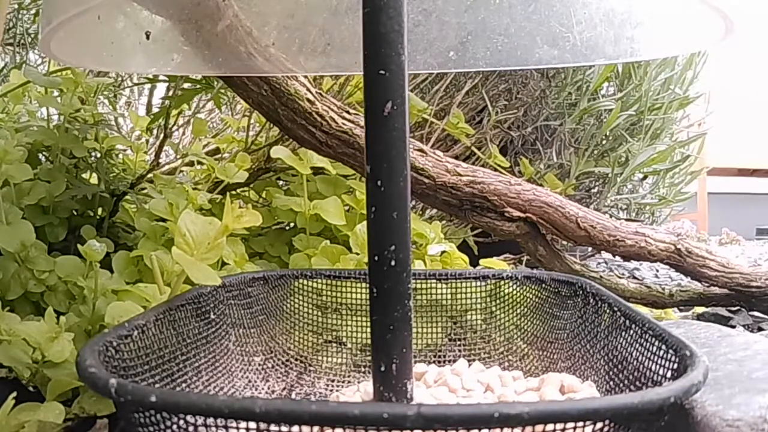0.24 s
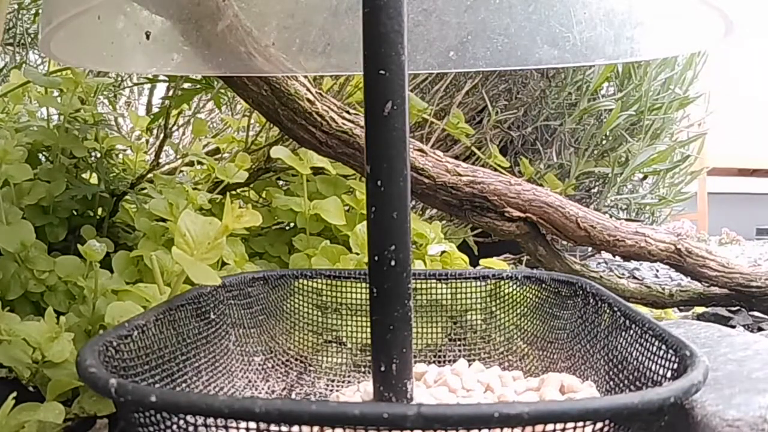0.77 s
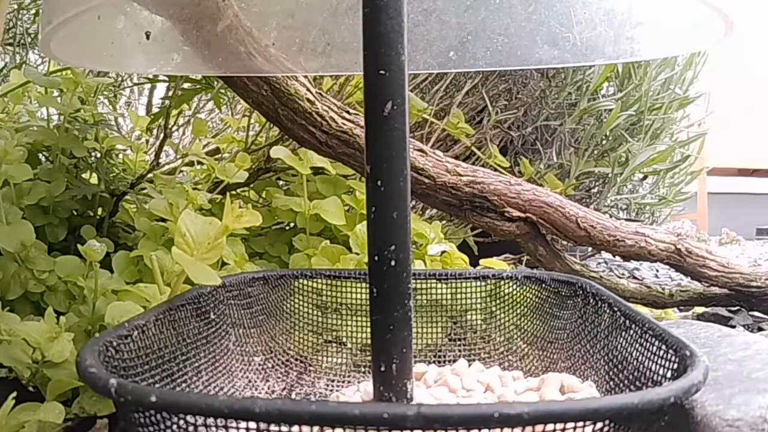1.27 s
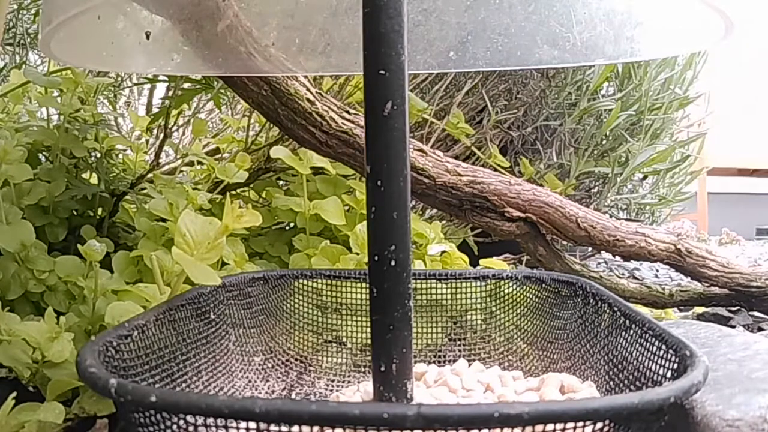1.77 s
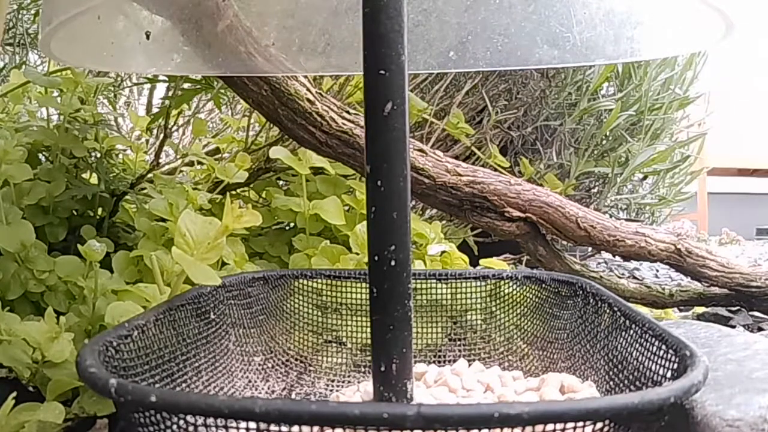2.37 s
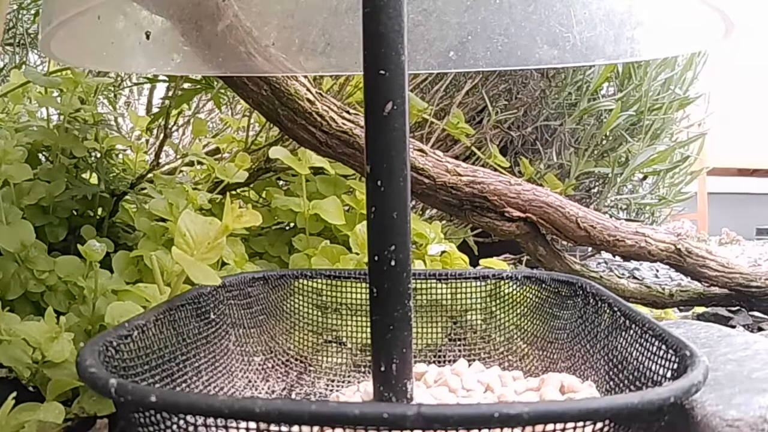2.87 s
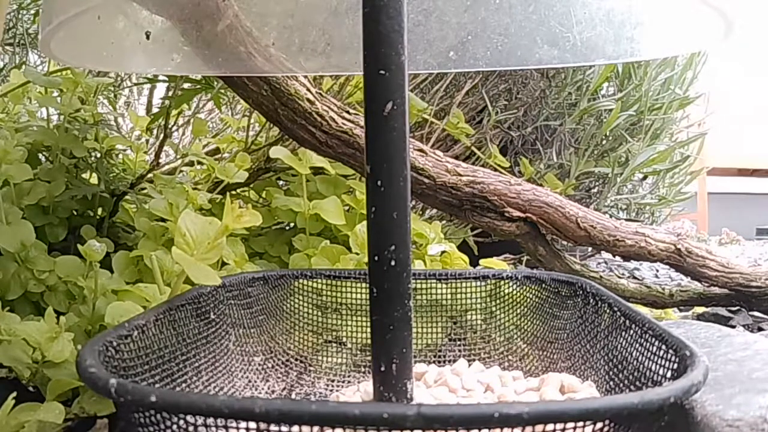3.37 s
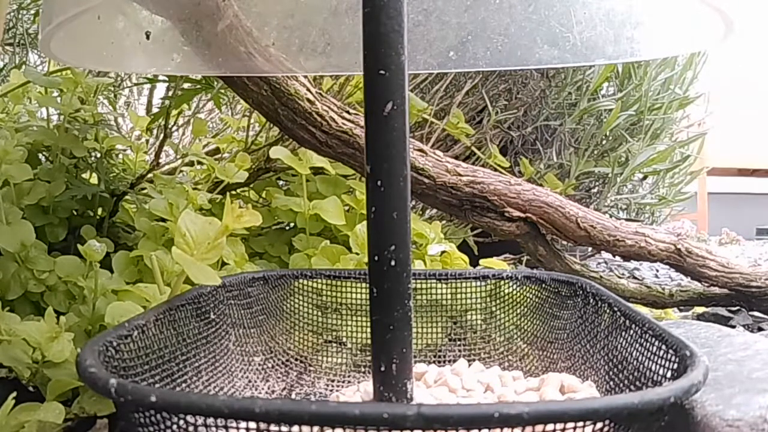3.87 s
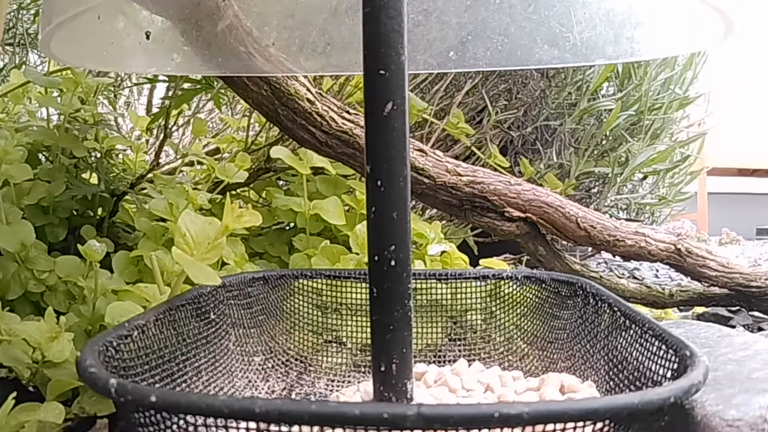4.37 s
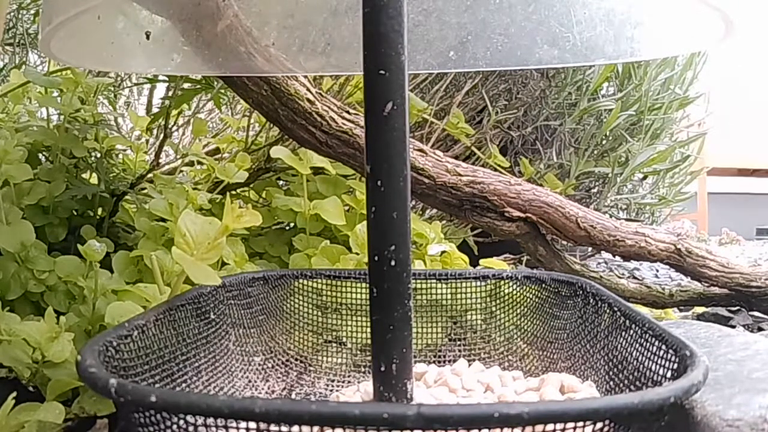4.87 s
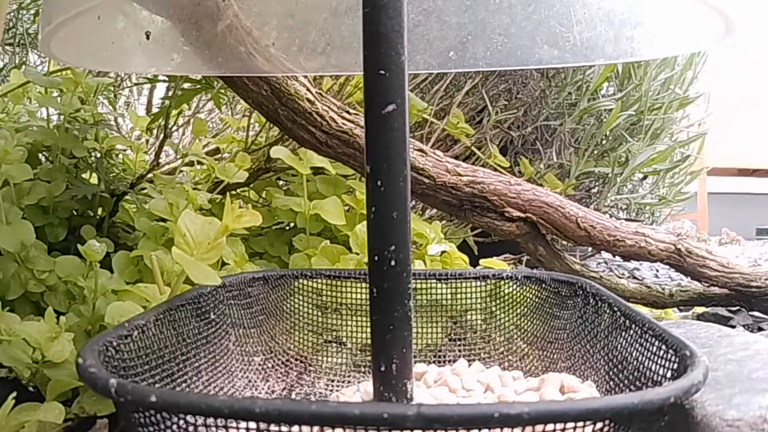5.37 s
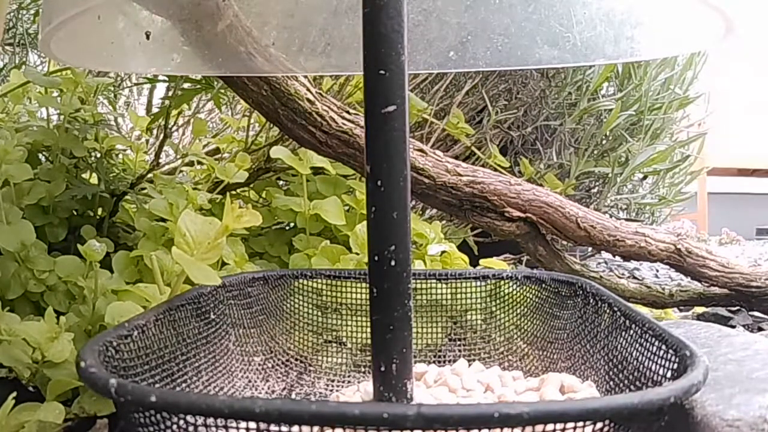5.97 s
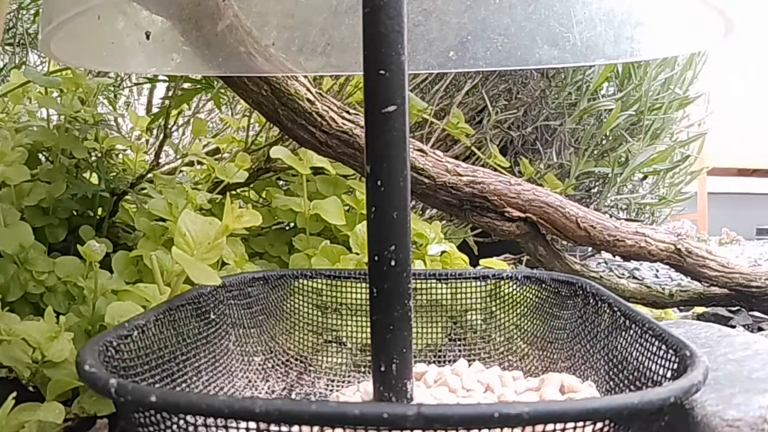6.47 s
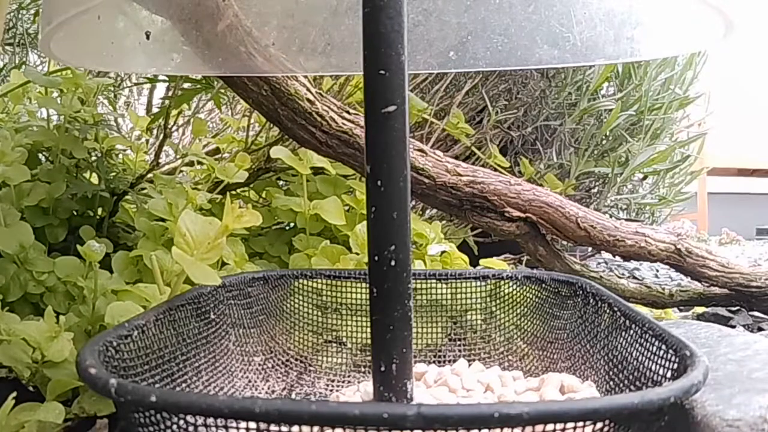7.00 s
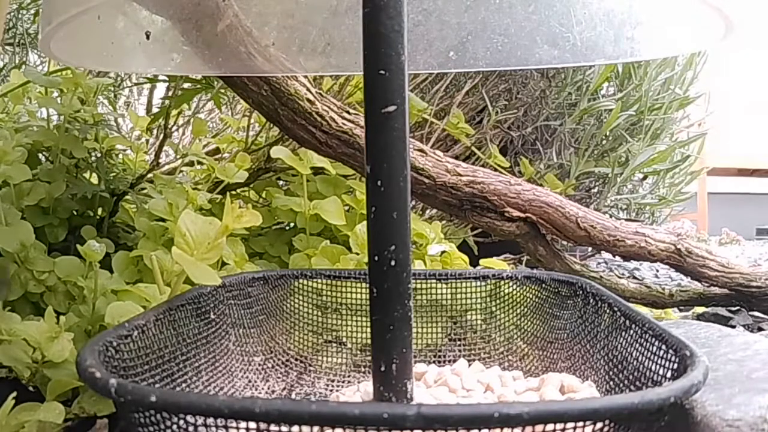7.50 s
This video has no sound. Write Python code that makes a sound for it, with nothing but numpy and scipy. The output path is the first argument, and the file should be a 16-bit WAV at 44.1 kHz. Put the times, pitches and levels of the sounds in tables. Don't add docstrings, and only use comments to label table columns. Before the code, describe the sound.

A small animal wails three times with descending calls, the last squeaky and broken, over soft distant traffic, far chirps and tiny insect ticks.

```python
import sys
import numpy as np
from scipy import signal
from scipy.io import wavfile
from scipy.ndimage import uniform_filter1d

SR = 44100
rng = np.random.default_rng(int(sys.argv[2]) if len(sys.argv) > 2 else 0)


def undo_db(level):
    steps = np.asarray(level, float) / 20
    return 10 ** steps


def inscribe(sig):
    pcm = np.round(np.clip(np.atleast_2d(sig).T, -1, 1) * 32767)
    wavfile.write(sys.argv[1], SR, pcm.astype(np.int16))


N = 341334
DROPOUT_S = 1.2593


def evened(x):
    return x / np.sqrt(np.mean(x ** 2) + 1e-20)


def read(points, hz):
    f, value = np.transpose(points)
    return np.interp(np.log(hz + 1), np.log(f + 1), value)


def curves(rows):
    s, *columns = np.transpose(sorted(rows))
    t = np.arange(round(s[0] * SR), round(s[-1] * SR)) / SR
    return t, *(np.interp(t, s, c) for c in columns)


def span(t):
    start = round(t[0] * SR)
    return slice(start, start + len(t))


def add(mix, s, sound):
    part = mix[round(s * SR):][:len(sound)]
    part += sound[:len(part)]


def add_bump(curve, s, length, size):
    add(curve, s - length / 2, np.multiply.outer(np.hanning(round(length * SR)), size))


def wander(hz):
    smooth = signal.butter(2, hz, fs=SR, output="sos")
    return evened(signal.sosfiltfilt(smooth, rng.standard_normal(N)))


def tone(db, turns):
    return np.sqrt(2) * undo_db(db) * np.cos(2 * np.pi * turns)


def resonate(x, hz, width):
    turn = np.exp(2j * np.pi * hz * np.arange(len(x)) / SR)
    r = np.exp(-np.pi * width / SR)
    return 2 * (turn * signal.lfilter([(1 - r) ** 2], [1, -2 * r, r ** 2], x / turn)).real


# (frequency [Hz], density [dB per Hz])
HUSH_SPECTRUM = [(18, -26.5), (27, -8.5), (45, 2.5), (90, -4.5), (170, -9), (320, -14.5), (700, -21),
                 (1440, -26.5), (2600, -32), (5100, -36.5), (9200, -40.5), (11400, -40), (13400, -47),
                 (14000, -51.5), (15100, -52.5), (15500, -78.5)]
# (frequency [Hz], width [Hz], level [dB])
TREBLE_BANDS = [(10000, 270, -15.5), (11930, 350, -15), (12900, 250, 2), (11360, 140, 0.5)]


def hush():
    frames, hz = N // 512 + 5, np.fft.rfftfreq(2048, 1 / SR)
    a, b, patches = rng.standard_normal((frames, 1025, 3)).T
    patches = uniform_filter1d(patches, size=16, axis=0)
    patches = evened(uniform_filter1d(patches, size=8, axis=1))
    bands_db = sum(db * np.exp(-((hz - f) / w) ** 2) for f, w, db in TREBLE_BANDS)
    patchy_db = 1.2 - 0.6 * np.clip(hz / 12000, 0, 1)
    level_db = (read(HUSH_SPECTRUM, hz) + bands_db)[:, None] + patchy_db[:, None] * patches
    noise = signal.istft((a + 1j * b) * undo_db(level_db), nperseg=2048, noverlap=1536)[1][:N]
    return undo_db(-55.5) * evened(noise)


# (time [s], peak level [dB])
INSECT_TICKS = [(.2843, -83), (.4209, -80), (.5576, -81), (.6504, -79), (1.7843, -75.5), (1.9913, -80),
                (2.114, -81.5), (2.295, -79.5), (2.5366, -83.5), (2.6653, -83), (2.835, -80), (3.045, -79),
                (3.2844, -77.5), (3.5494, -79), (4.367, -79), (4.7895, -78.5), (5.0544, -81), (5.5323, -82),
                (5.7825, -77.5), (5.9529, -78.5), (6.0841, -78.5), (6.2951, -81.5), (6.5056, -79.5),
                (6.6527, -80), (6.7965, -79.5), (6.985, -77), (7.1626, -80), (7.3158, -80), (7.5203, -81),
                (7.6445, -77), (3.77, -82), (4.015, -82), (4.16, -82)]


def insects():
    out, scratch = np.zeros(N), rng.standard_normal((len(INSECT_TICKS), 900))
    t = np.arange(900) / SR
    swell = t / 0.0025 * np.exp(1 - t / 0.0038)
    for (s, db), noise in zip(INSECT_TICKS, scratch):
        hz = 11260 + 80 * noise[0]
        add(out, s, undo_db(db - 3.0) * evened(resonate(noise, hz, 500)) * swell)
    return out


# (time [s], length [s], pitch jump [share], level [dB], even
# partials [dB])
VOICE_CATCHES = [(0.561, .02, 0, 1.5, -6), (0.615, .045, .018, 1, -2.5), (1.612, .03, 0.036, -8, -1),
                 (1.461, 0.017, .012, 0, 1), (.624, .01, 0, 0.5, -8), (.628, .014, -.008, 1, 0),
                 (0.712, .04, .009, 2, -2), (0.771, 0.033, -0.00056, -3.5, 7),
                 (0.796, .02, 0.0059, -1, 1), (0.825, .02, 0.0099, -2, 1), (1.003, 0.077, .006, 0.2, 2),
                 (1.121, .04, -0.014, -3.5, 5.5), (1.207, .02, -.01, -0.5, 3),
                 (1.302, .08, -.011, 2, -1.5), (1.428, 0.023, .014, -0.5, -5),
                 (1.453, 0.018, .015, 0.5, 0), (0.632, 0.033, -0.014, 3.5, -14),
                 (0.68, 0.065, 0, -2, -6.5), (0.824, 0.074, -0.03, 4.5, -0.5),
                 (0.866, .08, 0.0058, 1.5, 5.5), (0.981, .08, -0.021, -2, 2),
                 (1.081, 0.12, 0.012, 3, -5.5), (1.136, 0.035, -.012, 4, -7),
                 (1.155, 0.063, .028, -7.5, 9.5), (1.244, 0.055, 0, -3.5, 3),
                 (1.45, 0.053, -0.0062, 1, -6), (1.555, 0.065, -0.013, 2, -12),
                 (1.57, 0.036, -.04, 4, 4.5),
                 (3.072, .04, -0.035, -0.5, -1.5), (3.215, .02, 0.011, 3, -3.5),
                   (3.614, .04, -0.032, -1, 1.5), (3.038, 0.011, 0, -20, 3),
                   (3.05, 0.014, 0.022, -5.5, 6.5), (3.629, .014, 0.0063, -4, -9),
                   (3.701, 0.022, -0.015, -0.5, -2), (3.736, 0.017, 0.022, 3.5, -1),
                   (3.82, .03, 0, -3.5, 4), (3.888, .035, -0.018, 1, -11), (3.072, 0.043, 0.033, 9, -16.5),
                   (3.1, 0.081, -0.00049, 3, -2), (3.249, 0.069, 0.0148, -1, 4),
                   (3.344, 0.023, 0.017, -0.5, 2), (3.368, 0.036, -0.021, 4.5, -5),
                   (3.386, 0.04, 0.016, 2, -0.5), (3.54, 0.16, 0, 1.5, 2), (3.613, 0.028, 0.013, 0, -6.5),
                   (3.679, 0.063, 0.011, 3.5, 0), (3.705, 0.024, -0.014, -7, 10),
                   (3.79, 0.042, -0.016, -2, 1), (3.8, 0.12, 0.021, -18, 18.5),
                   (3.855, 0.11, 0.0041, 3, 4.5), (3.66, .04, .012, 0, -1), (3.575, .04, -.008, 0, 0),
                   (3.047, .008, -0.0017, 1, 1),
                 (5.122, .03, 0.0028, 1, -15), (5.225, .02, 0.0427, -1, 1),
                      (5.314, 0.041, -.01, 1.5, 2), (5.345, 0.036, -.015, 3, 3.5),
                      (5.37, 0.019, -0.0205, -1, 7), (5.42, 0.057, -.015, 3.5, -7),
                      (5.453, .04, 0.043, -1, -4.5), (5.472, .036, .17, 2, -9.5),
                      (5.496, 0.071, 0, -20.5, 8.5), (5.565, 0.0847, .045, -2.5, 0.5),
                      (5.597, 0.04, .02, -0.5, -8.5), (5.729, 0.042, 0.12, -9, -9),
                      (5.743, 0.04, -0.16, -21, 2), (5.77, 0.043, -.02, -1.5, -22),
                      (5.793, 0.058, -.025, 6, -14), (5.87, 0.03, 0, 1.5, -4.5),
                      (5.485, .025, .05, 7, -19.5), (5.501, 0.013, .02, 1, 4.5),
                      (5.536, 0.015, 0.0065, 2, -10), (5.713, 0.017, .02, -5.5, 1),
                      (5.73, 0.015, -.03, 7, -4.5), (5.744, .018, .05, 12, -2), (5.547, 0.0092, 0, -4, -4),
                      (5.815, 0.038, 0, 5.5, -6.5), (5.846, .016, 0, -4.5, 4), (5.861, .016, 0, 5, -4),
                      (5.915, .05, 0.032, -17.5, 21), (5.59, .035, .025, -0.5, 0),
                      (5.638, 0.036, 0, 1.5, 0), (5.398, .014, 0.028, -1.5, 2.5),
                      (5.303, .014, -0.0114, -1.5, 2.5)]
# (time [s], length [s], level [dB])
MOUTH_SHIFTS = [(3.132, 0.082, -4), (3.38, .02, -6.5), (3.448, 0.044, -6), (3.608, .02, -4.5),
                (3.63, .04, -14), (3.66, .03, 4.5), (3.702, 0.022, 6.5), (3.722, 0.017, -2),
                (5.383, 0.017, -6.5), (5.433, .04, 4.5), (5.475, 0.033, -17), (5.528, .03, -7),
                (5.547, .03, 7), (5.79, .03, -7), (5.814, .016, -8), (5.86, .016, 2.5), (.78, .09, 8),
                (3.8, .04, 7)]
# (time [s], length [s], level [dB])
FOURTH_PARTIAL = [(3.11, .04, 5), (3.235, .14, -12), (3.33, .07, 7), (3.41, .07, 3), (3.6, .05, -8),
                  (3.66, .05, 0), (5.22, .06, -7.5), (5.278, .06, 8), (5.33, .04, 13), (5.36, .04, 4),
                  (5.432, .07, -6), (1.6, .05, -6), (1.29, .045, 7.5), (5.685, .07, -9), (5.86, .07, -9),
                  (5.915, .03, 7), (5.56, .06, 5), (3.57, .04, -3)]
EVEN_SHARE = [0, 0.9, 0.088, 0.73]
# (frequency [Hz], width [Hz], level [dB])
PASSAGE_BANDS = [(3536, 90, -5.5), (4040, 250, 8), (5370, 390, -0.5), (6294, 250, -12), (7100, 250, -27),
                 (8080, 320, 7), (8990, 450, 9), (13070, 3340, -27.5)]


def cry(rows, scoop, scoop_s, sag, *partials_db):
    t, hz, effort_db, even_db, bright_db = curves(rows)
    since, left = t - t[0], t[-1] - t
    catches = np.zeros((5, N))
    for s, length, *sizes in VOICE_CATCHES:
        add_bump(catches[:3].T, s, length, sizes)
    for s, length, db in MOUTH_SHIFTS:
        add_bump(catches[3], s, length, db)
    for s, length, db in FOURTH_PARTIAL:
        add_bump(catches[4], s, length, db)
    jump, dip_db, tip_db, glint_db, fourth_db = catches[:, span(t)]

    hz = hz * (1 - scoop * np.exp(-(since / scoop_s) ** 2))
    hz = hz * (1 - sag * np.maximum(1 - left / 0.06, 0) ** 2) * (1 + jump)
    hz = hz * (1 - 0.045 * (t[0] < DROPOUT_S) * (t > DROPOUT_S))
    hz = uniform_filter1d(hz, size=200)

    attack_db, attack_s, overtones_late_s = -12, 0.019, 0.019
    db = effort_db + dip_db + attack_db * np.maximum(1 - since / attack_s, 0)
    db = db - 6 * np.maximum(1 - left / 0.023, 0)
    bright_db = bright_db + glint_db + attack_db * np.clip(2 - since / overtones_late_s, 0, 1)
    levels = []
    for k, own_db in enumerate((0, *partials_db)):
        passage_db = sum(g * np.exp(-(((k + 1) * hz - f) / w) ** 2) for f, w, g in PASSAGE_BANDS)
        colour_db = EVEN_SHARE[k] * (even_db + tip_db) + k // 2 * bright_db + k // 3 * fourth_db
        levels.append(db + own_db + colour_db + passage_db)
    return t, hz, levels


# (time [s], pitch [Hz], effort [dB], lift of the even partials [dB], brightness [dB])
HIGH_CRY_PATH = [
    (0.546, 4540, -61.5, -24, 0),
    (0.593, 4500, -42, -8.5, -4),
    (.635, 3937, -39.5, -18.5, -8),
    (.715, 3345, -46.5, -6.5, -15.5),
    (.985, 2754, -48, 1, 1.5),
    (1.202, 2440, -50.5, 6.5, -7.5),
    (1.402, 2453, -46, 6, 14),
    (1.469, 2184, -42, -5.5, -14.5),
    (1.611, 2175, -46.5, 5.5, 4),
]
LOW_CRY_PATH = [
    (3.036, 1452, -59, 3.3, 2),
    (3.202, 1377, -53, 1, 5),
    (3.301, 1245, -59, 1.5, 2),
    (3.478, 1118, -54.5, 5, -3),
    (3.59, 1102, -52.5, 7.5, 1),
    (3.63, 1048, -56, 9.3, 0.5),
    (3.72, 1025, -53, 7.4, 6.5),
    (3.791, 917, -64, 11.8, -5),
    (3.906, 886, -60, 5.8, -2.5),
]
BROKEN_CRY_PATH = [
    (5.12, 1372, -53, -10.5, 4),
    (5.189, 1419, -52, 0, 4.5),
    (5.3, 1374, -52, -1.5, 2),
    (5.375, 1242, -61, 1, 12),
    (5.525, 1111, -52.5, 6, -1.5),
    (5.614, 1048, -45.5, -.5, -3.5),
    (5.703, 1042, -49, -2, -0.5),
    (5.829, 992, -57, 12, -7.5),
    (5.927, 927, -58, 10, 11.5),
]
# (scoop up into the pitch [share], scoop time [s], final sag [share],
# partial 2 [dB], partial 3 [dB], partial 4 [dB])
CRY_VOICES = [
    (-0.068, 0.015, 0.4, -12.5, -33, -44.5),
    (0.27, 0.027, 0.14, 1.5, -8.5, -29),
    (.11, 0.0161, 0.26, 0.5, -15.5, -33.5),
]


def cries(uneven, tremble, shimmer_db, throb):
    out, turns, pitch = np.zeros((3, N))
    slip = wander(220)
    for rows, voice in zip((HIGH_CRY_PATH, LOW_CRY_PATH, BROKEN_CRY_PATH), CRY_VOICES):
        t, hz, levels = cry(rows, *voice)
        at = span(t)
        pitch[at] = hz * (1 + 0.0039 * tremble[at])
        turns[at] = np.cumsum(pitch[at]) / SR + 0.085 * (uneven * slip)[at]
        if t[0] < DROPOUT_S:
            turns[at] += np.where(t < DROPOUT_S, 0.31, 0.0) - turns[round(DROPOUT_S * SR)]
        stack = np.zeros(len(t))
        for k, db in enumerate(levels):
            db = db - 2 * np.maximum(-83 - db, 0)
            beats = 1 + min(k + 0.11, 1) * (uneven * throb)[at]
            stack += tone(db + 0.9 * shimmer_db[at], (k + 1) * turns[at]) * beats
        out[at] = stack * signal.windows.tukey(len(t), 0.012)
    return out, turns, pitch


# (time [s], length [s], start pitch [Hz], end pitch [Hz], level [dB])
BIRD_CHIRPS = [(.665, .05, 2560, 2420, -72), (.74, .09, 4160, 3920, -73), (1.75, .035, 3890, 4130, -76),
               (1.87, .047, 4200, 3580, -72.5), (1.9, .027, 3650, 4150, -69), (2.85, .025, 3850, 4050, -76),
               (2.935, .03, 2390, 2240, -74), (3.99, .06, 4280, 3690, -74), (6.238, .014, 3200, 1950, -70),
               (7.155, .045, 2660, 2540, -77), (7.18, .055, 2580, 2535, -75.5),
               (7.185, .035, 2620, 2760, -76.5), (7.22, .05, 2610, 2560, -79),
               (6.285, .05, 2450, 2750, -79), (7.09, .06, 2960, 2900, -79), (5.96, .03, 3150, 2900, -80),
               (5.96, .065, 3000, 2430, -78), (6.005, .05, 2480, 2430, -72), (6.035, .075, 2440, 2760, -76),
               (6.22, .08, 2790, 2390, -76)]


def birds():
    out, fray = np.zeros(N), wander(hz=90)
    for s, length, start_hz, end_hz, db in BIRD_CHIRPS:
        u = np.linspace(0, 1, round(length * SR))
        hz = start_hz + (end_hz - start_hz) * u
        add(out, s, tone(db, np.cumsum(hz) / SR) * np.sin(np.pi * u))
    return out * (1 + 0.45 * fray)


# (time [s], length [s], breath level [dB], unevenness [0-1])
VOICE_BREAKS = [(1.262, 0.0051, -58, 0.05), (1.284, 0.017, -64.5, 0.1), (1.303, 0.0072, -72.5, .05),
                (1.346, 0.012, -67.5, 0.05), (3.061, 0.048, -76, 0.3), (3.591, 0.0062, -62.5, 0.5),
                (3.62, 0.07, -59, 0.4), (3.692, 0.04, -65, 0.15), (3.79, 0.066, -71, 0.32),
                (3.886, 0.045, -66, 0.4), (5.302, 0.15, -82, 0.13), (5.395, 0.13, -83, 0.2),
                (5.499, 0.032, -69.5, 0.2), (5.532, 0.038, -74.5, 0.4), (5.607, 0.032, -67, 0.25),
                (5.74, 0.055, -63.5, 0.6), (3.62, .012, -59.5, .2), (3.636, .02, -61, .2),
                (3.755, .025, -66, 0.1), (3.859, 0.022, -67, .2), (5.345, .025, -70, .1),
                (5.376, 0.026, -70, .1), (5.419, 0.023, -70, .1), (5.65, .015, -68, 0.2)]


def uneven_beats():
    uneven = np.zeros(N)
    for s, length, _, share in VOICE_BREAKS:
        add_bump(uneven, s, length, share)
    return uneven


# (frequency [Hz], width [Hz], level [dB])
NARROW_THROAT = [(3820, 170, 0)]
# (frequency [Hz], width [Hz], level [dB])
OPEN_THROAT = [(1480, 820, 5.5), (2270, 980, 6.5), (2870, 260, -34), (4230, 790, -10)]


def breath():
    out = np.zeros(N)
    noises = rng.standard_normal((len(VOICE_BREAKS), 5000))
    for (s, length, db, _), noise in zip(VOICE_BREAKS, noises):
        throat = NARROW_THROAT if s < 2 else OPEN_THROAT
        puff = evened(sum(undo_db(g) * resonate(noise, f, w) for f, w, g in throat))[:round(length * SR)]
        grain = evened(uniform_filter1d(noise[::-1], size=90))[:len(puff)]
        puff = puff * np.maximum(1 + 0.6 * grain, 0)
        add(out, s - length / 2, undo_db(db) * puff * np.hanning(len(puff)))
    return signal.sosfilt(signal.butter(4, 6000, fs=SR, output="sos"), out)


# (time [s], share of the pitch [share], level [dB])
FLUTTER_PATH = [
    (1.366, .4, -68),
    (1.395, .4, -69),
    (1.42, .47, -68),
    (1.435, .49, -75),
    (1.456, .47, -73),
    (1.468, .38, -71),
    (1.5, .33, -68),
    (1.532, .34, -67),
    (1.544, .46, -70),
    (1.56, .4, -79),
]
SIDE_PLACES = [(0, 1), (1, -1), (1, 1), (2, -1), (2, 1), (3, -1), (0, 2), (1, 2)]
SIDE_LEVELS = [0.5, 4.5, 3.5, 4, -9, -9, -1, -6]


def flutter(turns, pitch, tremble, shimmer_db, throb):
    out = np.zeros(N)
    t, share, db = curves(FLUTTER_PATH)
    at = span(t)
    side_turns = np.cumsum(pitch[at] * (share + 0.012 * tremble[at])) / SR
    for (k, side), side_db in zip(SIDE_PLACES, SIDE_LEVELS):
        own_shimmer_db = 2.2 * np.roll(shimmer_db, 3000 * (k + 3 * side))[at]
        out[at] += tone(db + side_db + own_shimmer_db, k * turns[at] + side * side_turns)
    out[at] *= signal.windows.tukey(len(t), 0.08) * (1 + 0.25 * throb[at])
    return out


BLEND_TONES = [(1, 1), (2, 0)]
BLEND_LEVELS = [-3, -12]


def membrane(rows, turns, jitter):
    out = np.zeros(N)
    t, hz, db, coupling_db = curves(rows)
    at = span(t)
    second = np.cumsum(hz * (1 + jitter[at])) / SR
    sound = tone(db, second)
    for (a, b), blend_db in zip(BLEND_TONES, BLEND_LEVELS):
        sound += tone(db + coupling_db + blend_db, a * second + b * turns[at])
    out[at] = sound * signal.windows.tukey(len(t), 0.2)
    return out


# (time [s], length [s], start pitch [Hz], end pitch [Hz], level [dB])
SQUEAK_GLIDES = [(3.603, 0.025, 2450, 2250, -54), (3.876, 0.023, 1990, 1850, -52.5),
                 (5.334, 0.019, 2780, 2700, -52), (5.366, .036, 2200, 2600, -52.5),
                 (5.394, 0.047, 2400, 2400, -58), (5.408, 0.022, 2880, 2830, -65.5),
                 (5.733, .014, 2870, 2850, -62), (5.741, 0.015, 2600, 2660, -60),
                 (5.493, 0.02, 2570, 2500, -64.5), (5.733, .016, 2800, 1800, -52.5),
                 (5.586, 0.023, 2250, 2660, -56.5), (5.721, 0.021, 2450, 2560, -51),
                 (5.744, 0.024, 2260, 2050, -55.5), (5.737, 0.016, 2100, 1900, -56),
                 (5.37, .02, 2680, 2300, -60), (5.342, .016, 2850, 2780, -60),
                 (5.376, .014, 2230, 2180, -58), (5.29, .02, 2480, 2440, -66),
                 (3.616, 0.013, 2650, 2500, -62), (3.89, .016, 1900, 1550, -58.5)]


def squeaks(turns, jitter):
    out = np.zeros(N)
    for s, length, start_hz, end_hz, db in SQUEAK_GLIDES:
        rows = []
        for u in np.linspace(0, 1, 7):
            hz = start_hz + u * (end_hz - start_hz)
            rows.append((s + u * length, hz, db - 7.5 * (2 * u - 1) ** 2, -28))
        out += membrane(rows, turns, 0.017 * jitter)
    return out


# (time [s], pitch [Hz], level [dB], coupling to the first [dB])
SECOND_PATH = [
    (5.108, 1770, -73, -20),
    (5.113, 1984, -50, -23),
    (5.12, 2380, -47.5, -30.5),
    (5.13, 2330, -52, -24),
    (5.14, 2500, -57, -6.5),
    (5.18, 2563, -53, -1.5),
    (5.215, 2410, -62.5, 6),
    (5.225, 2400, -92.5, 0),
]


def second_membrane(turns, jitter):
    return membrane(SECOND_PATH, turns, 0.005 * jitter)


def animal():
    tremble, shimmer_db, jitter, throb = (wander(hz) for hz in (59.0, 73.6, 150, 200))
    voice, turns, pitch = cries(uneven_beats(), tremble, shimmer_db, throb)
    voice = voice + breath() + flutter(turns, pitch, tremble, shimmer_db, throb)
    return voice + squeaks(turns, jitter) + second_membrane(turns, jitter)


# (frequency [Hz], decay time to -60 dB [s])
YARD_DECAY = [(500, 0.11), (2000, 0.11), (5000, 0.13), (10000, 0.14)]


def yard(x):
    taps = np.zeros(SR // 2)
    at = np.arange(300, len(taps) - 20, 20)
    taps[at + rng.integers(0, 20, len(at))] = rng.choice([-1., 1.], len(at))
    hz, t, z = signal.stft(taps, SR, nperseg=256)
    tail = signal.istft(z * undo_db(-60 * t / read(YARD_DECAY, hz)[:, None]), SR, nperseg=256)[1]
    return signal.fftconvolve(x, tail / np.linalg.norm(tail))[:N]


# (frequency [Hz], threshold over the usual floor [dB])
DROP_THRESHOLD = [(3000, -15), (5000, -5), (8000, 0), (10000, 4.5), (13300, 4.5), (14300, 8.5)]
# (frequency [Hz], depth [dB])
HIDING_DEPTH = [(3000, 110), (4500, 48), (5500, 33), (9000, 27)]


def thrifty(x):
    hz, t, z = signal.stft(x, SR, nperseg=2304)
    power_db = 10 * np.log10(abs(z) ** 2 + 1e-16)
    slope_db = 7.7 * hz[:, None] / 1000
    hidden_db = np.maximum.accumulate(power_db + slope_db, axis=0) - slope_db
    hidden_db = hidden_db - read(HIDING_DEPTH, hz)[:, None]
    busy_db = np.clip(power_db[hz > 800].max(axis=0) + 56.5, 0, 18)
    usual_db = np.median(power_db, axis=1) + read(DROP_THRESHOLD, hz)
    loud_db = usual_db[:, None] + 0.55 * busy_db * (hz < 9600)[:, None]
    threshold_db = np.maximum(hidden_db, loud_db)
    kept = 1 / (1 + undo_db(8 * (threshold_db - power_db)))
    return signal.istft(z * kept, SR, nperseg=2304)[1][:N]


def scene():
    voice, far = animal(), birds()
    near = voice + undo_db(-15.5) * yard(voice)
    return (hush() + insects() + near + far + undo_db(-4) * yard(far))[None]


def roll_off(x):
    return signal.sosfilt(signal.butter(12, 16300, fs=SR, output="sos"), x)


def record(dry):
    thinned = thrifty(dry[0])
    edge = np.exp(-np.arange(40) / SR / 0.00005)
    add(thinned, DROPOUT_S, undo_db(-38) * edge)
    return roll_off(thinned[None])


dry = scene()
out = record(dry)
inscribe(out)
```